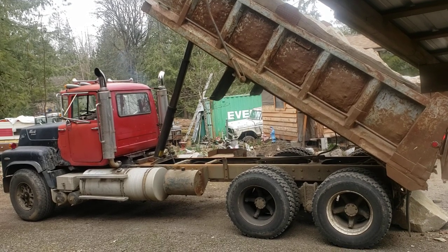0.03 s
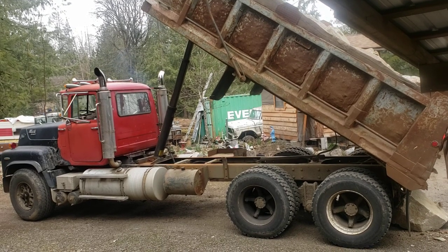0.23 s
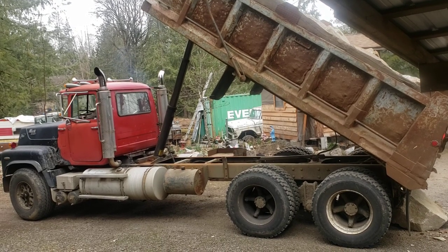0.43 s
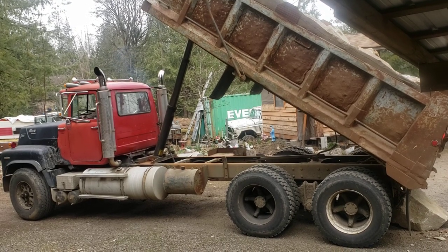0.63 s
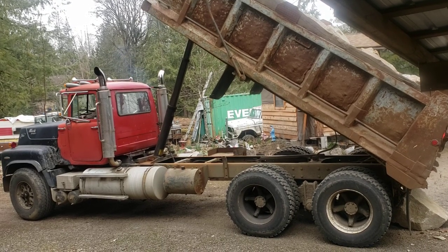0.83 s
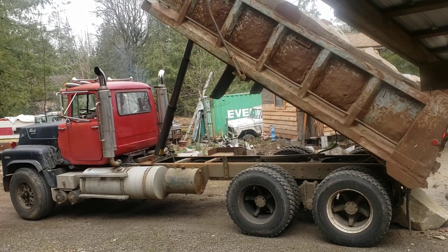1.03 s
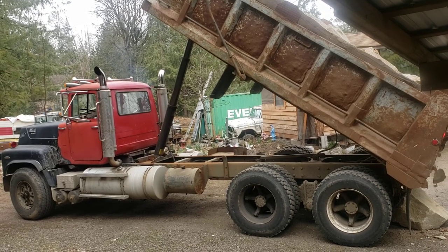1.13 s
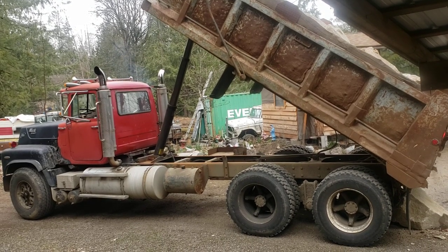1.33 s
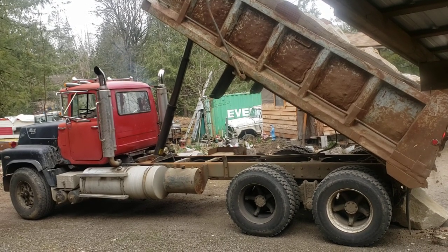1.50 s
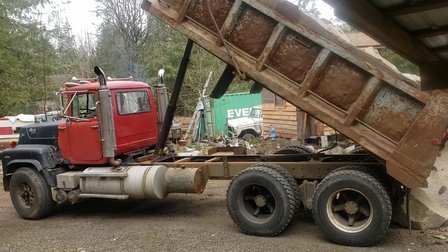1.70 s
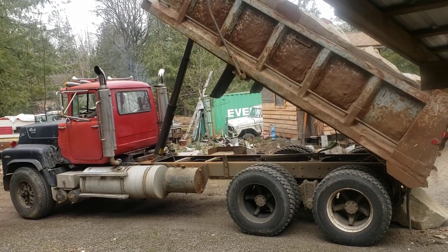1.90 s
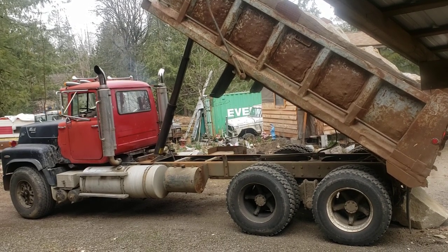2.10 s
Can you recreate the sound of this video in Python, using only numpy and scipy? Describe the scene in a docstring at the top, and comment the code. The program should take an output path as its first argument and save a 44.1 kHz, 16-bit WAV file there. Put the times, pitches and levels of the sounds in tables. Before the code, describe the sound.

A truck tailgate slams with a massive steel bang at about 0.35 s, several clashing blows packed together, weaker thumps until 0.85 s, and a ring dying within about half a second. Before it, a low diesel throbs and clatters under a falling hoist whine and faint whistle. The engine then eases quieter; a low hum swells near 0.9 s, and dry grit ticks and trickles until about 2.1 s.

```python
"""A dump truck stands in a gravel yard, its bed raised and its six-cylinder diesel running.
At first exhaust tones, drone and clatter sound under a sagging hoist whine, a whistle and trickling grit.
The tailgate then slams: decaying modes ring in bed and plates, and dying noise booms and clashes.
Panels pop as short low pulses and weaker bumps follow, while the engine eases off.
A bed hum swells and fades midway, soon after the slam; grit, as filtered noise, ticks to the end."""
import sys
import numpy as np
from scipy import signal
from scipy.fft import rfft, irfft
from scipy.io import wavfile
from scipy.ndimage import uniform_filter1d

SR = 44100
rng = np.random.default_rng(int(sys.argv[2]) if len(sys.argv) > 2 else 0)


def materialize(psi):
    """Save the field psi as 16-bit PCM at rate SR to the path in sys.argv[1].

    A 1-D psi becomes a single channel; in a 2-D psi each row is a channel.
    """
    bounded = np.clip(np.atleast_2d(psi).T, -1, 1)
    quanta = np.round(bounded * 32767).astype(np.int16)
    wavfile.write(sys.argv[1], SR, quanta)


N = 94815  # samples
T = np.arange(N) / SR
HZ = np.fft.rfftfreq(N, 1 / SR)


def amp(db):
    """Decibel law: 20 dB is a tenfold amplitude."""
    return 10 ** (np.asarray(db) / 20)


def evened(x):
    """Normalisation: scales to rms 1."""
    return x / np.sqrt(np.mean(x ** 2) + 1e-20)


def read(table, hz, axis=1):
    """Interpolation of one table column along a log-frequency axis."""
    rows = np.transpose(table)
    return np.interp(np.log(hz + 1), np.log(rows[0] + 1), rows[axis])


def curve(table, axis=1):
    """Linear interpolation of one table column over time."""
    rows = np.transpose(table)
    return np.interp(T, rows[0], rows[axis])


def add(mix, start_s, sound):
    """Superposition: adds a sound to the mix from its start, cut at the end."""
    part = mix[:, round(start_s * SR):][:, :sound.shape[-1]]
    part += sound[..., :part.shape[1]]


def colour(x, gain):
    """Linear filtering: multiplies the spectrum by a gain."""
    return irfft(rfft(x) * gain, N)


# Microphone pair: frequency_hz, left_right_correlation (-1 to 1), left_minus_right_db
MICROPHONE_PAIR = [(40, 0.72, 0), (150, 0.99, 0.5), (300, 0.92, -2.5), (644, 0.44, -1.6), (1370, -0.17, -1),
                   (2340, 0.084, 1.5), (4050, -0.13, -3.5), (7000, -0.26, -17), (9300, 0.16, -11.5),
                   (13000, -0.043, -1)]


def spread(x):
    """Partial coherence: mid and side weights set how alike left and right are in each band."""
    likeness = np.clip(read(MICROPHONE_PAIR, HZ), -1, 1)
    lean = amp(read(MICROPHONE_PAIR, HZ, axis=2))
    mid, side = rfft(x) * np.sqrt([1 + likeness, 1 - likeness])
    left_right = np.array([(mid + side) * lean, mid - side])
    return irfft(left_right / np.sqrt(1 + lean ** 2), N)


def noise(grain=0):
    """Modulated noise: random 32-sample steps of level make it gritty when grain is above zero."""
    lumps = np.repeat(rng.standard_normal(N // 32 + 1), 32)[:N]
    return spread(rng.standard_normal((2, N)) * np.exp(grain * lumps))


def ripple(depth_db):
    """Modal crowding: random peaks and dips across the spectrum, with an rms depth at the knots."""
    knot_spacing_hz = 44.94
    knots = rng.standard_normal(2000)
    return amp(depth_db * np.interp(HZ / knot_spacing_hz, np.arange(2000), knots))


def tone(hz, wander_hz):
    """Frequency modulation: a sine whose pitch wanders by an rms amount."""
    drift = evened(uniform_filter1d(rng.standard_normal(N), size=700))
    return np.sin(2 * np.pi * np.cumsum(hz + wander_hz * drift) / SR)


def fall(t60_s):
    """Exponential decay: 60 dB of fall in t60_s."""
    return np.exp(-np.log(1000) * T / t60_s)


def rise(rise_s):
    """Exponential build-up: the time constant is rise_s."""
    return 1 - np.exp(-T / rise_s)


def dying(x, table, rise_s):
    """Frequency-dependent damping: each band of coloured noise decays at its own rate."""
    hz, t, bands = signal.stft(colour(x, amp(read(table, HZ))), SR, nperseg=512)
    t60_s = read(table, hz, axis=2)[:, None]
    tail = signal.istft(bands * 1e-3 ** (t / t60_s), SR, nperseg=512)[1][:, :N]
    return evened(tail * rise(rise_s)) / np.sqrt(N)  # mean energy per channel 1


# Engine speed and exhaust: time_s, firing_rate_hz, exhaust_level_db (rms)
ENGINE = [(0, 39.1, -26.5), (.1, 39.8, -30), (.3, 39.7, -30), (.38, 39.7, -36), (.65, 40.07, -39.5),
          (.9, 39.37, -40.5), (1.1, 36.54, -43.5), (1.4, 38.6, -40), (1.75, 38.53, -37.5),
          (2.15, 38.5, -37)]


def firings():
    """Phase accumulation: the running count of cylinder firings."""
    return np.cumsum(curve(ENGINE)) / SR


# Exhaust tones: multiple_of_cycle_rate (6 is the firing rate), relative_level_db
EXHAUST_ORDERS = [(5, -23), (6, -1), (7, -21.5), (8, -9.5), (9, -40), (12, -10)]


def exhaust():
    """Harmonic series: the periodic exhaust is a sum of multiples of the cycle rate."""
    start_turns = 0.494
    cycles = firings() / 6  # six firings to a cycle
    orders = [amp(db) * -np.cos(2 * np.pi * round(order) * (cycles - start_turns))
              for order, db in EXHAUST_ORDERS]
    return evened(sum(orders)) * amp(curve(ENGINE, axis=2))


def engine_noise():
    """Amplitude modulation: noise that swells with each firing."""
    return noise() * (1 + 0.097 * np.cos(2 * np.pi * firings()))


# Drone spectrum: frequency_hz, relative_density_db (per Hz)
DRONE_SPECTRUM = [(20, -40), (60, 3.5), (85, -5), (110, 0.5), (145, 1), (185, 0), (230, -12.5), (400, -19),
                  (1000, -93)]
# Drone loudness: time_s, level_db (rms)
DRONE_LEVEL = [(0, -35), (.15, -35.5), (.31, -27.5), (.45, -33), (.7, -34.5), (.9, -41), (1.1, -44.5),
               (1.6, -45.5), (2.15, -41)]


def drone():
    """Spectral shaping: firing-pulsed noise filtered to a low drone."""
    return evened(colour(engine_noise(), amp(read(DRONE_SPECTRUM, HZ)))) * amp(curve(DRONE_LEVEL))


# Clatter spectrum before the ripple: frequency_hz, relative_density_db (per Hz)
CLATTER_SPECTRUM = [(30, -41), (110, 0), (150, 6.5), (185, 6), (235, -2), (290, 3), (400, -0.5), (540, -2),
                    (700, -2), (1000, 0), (1400, -6.5), (1700, -5), (2800, -15.5), (3600, -15), (7000, -21),
                    (8300, -30), (11500, -19), (15500, -29)]
# Resonances of engine and pump: centre_hz, half_amplitude_width_hz, relative_level_db
ENGINE_RESONANCES = [(789, 28, -49), (984, 42, -52.5), (1665, 36, -56), (2513, 47, -59)]
# Loudness of clatter and resonances together: time_s, relative_level_db
CLATTER_LEVEL = [(0, 5), (.3, 7), (.5, 2), (.75, -1.5), (1.1, -1.5), (1.5, 0), (2.15, -0.5)]


def clatter():
    """Resonance: rippled, pulsed clatter beside steady noise passed through narrow peaks."""
    clatter_db, ripple_db = -36.5, 1.22
    pulsed = engine_noise()
    gain = amp(read(CLATTER_SPECTRUM, HZ)) * ripple(ripple_db)
    rattling = amp(clatter_db) * evened(colour(pulsed, gain))
    drive = noise()
    whine = 0
    for hz, width_hz, db in ENGINE_RESONANCES:
        peak = 1 / (1 + (2 * (HZ - hz) / width_hz) ** 2)
        whine = whine + amp(db) * evened(colour(drive, peak))
    return (rattling + whine) * amp(curve(CLATTER_LEVEL))


def diesel():
    """Superposition: tonal exhaust plus the drone and clatter noises."""
    return exhaust() + drone() + clatter()


# Hoist whine, sagging and fading: time_s, pitch_hz (centre of the wander), level_db (peak)
HOIST = [(0, 1013, -42), (.06, 982, -37), (.15, 900, -41), (.22, 869, -61), (.34, 870, -62),
         (.5, 850, -110)]
# Higher, steady whistle: time_s, level_db (peak)
WHISTLE_LEVEL = [(0, -46), (.05, -41), (.13, -47), (.25, -63), (.4, -110)]


def hoist():
    """Frequency modulation: the loaded hoist gives two wandering sines, one of them gliding."""
    wander_hz, whistle_hz = 13.4, 1708
    whine = amp(curve(HOIST, axis=2)) * tone(curve(HOIST), wander_hz)
    return whine + amp(curve(WHISTLE_LEVEL)) * tone(whistle_hz, wander_hz)


# Trickling grit: time_s, level_db (rms)
GRIT_LEVEL = [(0, -51), (.25, -41), (.5, -51.5), (1.07, -51.5), (1.1, -42.5), (1.3, -45), (1.55, -42),
              (1.85, -43), (2.15, -42.5)]
# Spectrum of trickle and tick treble: frequency_hz, relative_density_db (per Hz)
GRIT_SPECTRUM = [(1000, -43), (3500, -22), (7000, -8.5), (8300, -20.5), (9500, -8.5), (10800, -1.5),
                 (12300, 2.5), (14000, -8.5), (15700, -8)]
# Lower treble of a tick: frequency_hz, relative_density_db (per Hz)
CLINK_SPECTRUM = [(1200, -1), (2300, 2.5), (3200, -3), (4500, 0), (6500, -1.5), (8500, -16), (15000, -40)]
# Ticks of grit and loose fittings: start_s, relative_level_db, lower_treble_over_high_db
TICKS = [(.028, -34.5, -15), (.112, -32, -3), (.163, -20, 6), (.199, -30, -12), (.212, -37, -16),
         (0.316, -28, -2), (0.88, -39, -10), (.943, -33.5, 1), (.957, -38, 14.5), (1.086, -32, -18),
         (1.149, -31, -21), (1.161, -29, -28), (1.234, -32.5, -3), (1.329, -39, -7), (1.376, -32, -26),
         (1.398, -25.5, -12), (1.466, -27, -6), (1.501, -27.5, -16), (1.74, -35, 0), (1.9632, -30, -4.5),
         (1.973, -27, -6), (2.034, -29, -23)]


def grit():
    """Impact noise: a fine trickle, with sharp ticks that each decay into a short scatter."""
    tick_db, tick_s = -5, 0.0044  # common gain, decay constant
    scatter_db, scatter_s = -7.5, 0.028
    fizz = amp(read(GRIT_SPECTRUM, HZ))
    out = amp(curve(GRIT_LEVEL)) * evened(colour(noise(grain=0.45), fizz))
    high = evened(colour(noise(), fizz))
    low = evened(colour(noise(), amp(read(CLINK_SPECTRUM, HZ))))
    for start_s, db, low_db in TICKS:
        age = np.maximum(T - start_s, 0)
        decay = np.exp(-age / tick_s) + amp(scatter_db) * np.exp(-age / scatter_s)
        blend = (high + amp(low_db) * low) / np.hypot(1, amp(low_db))
        out = out + amp(tick_db + db) * (T >= start_s) * decay * blend
    return out


# A panel pops in and out: centre_s, level_db (peak), pulse_hz (spectral peak)
POPS = [(0.17, -20, 110), (0.283, -20, 115), (0.3447, -8.5, 217), (.355, -9, 130), (0.482, -4, 144),
        (0.61, -20, 115), (0.765, -23, 103), (0.846, -27, 151)]


def pops():
    """Pulse radiation: a flexing panel gives one short, low push with a lobe on either side."""
    out = np.zeros(N)
    for centre_s, db, hz in POPS:
        u = (np.pi * hz * (T - centre_s)) ** 2
        out += amp(db) * (2 * u - 1) * np.exp(-u)
    return out


# Ringing of the bed: pitch_hz, relative_level_db, t60_s
BED_MODES = [(115, -6, .65), (141, -8, .7), (158, -9, .6), (180, -5, .5), (223.7, 1.5, .45), (243, -11, .5),
             (263, -8, .65), (336, -6, .52), (372, -16, .55), (446, -15, .55), (673, -18, .5),
             (695, -20, .5), (809, -21, .5), (935, -18, .33), (972, -19, .42)]


def bed_ring():
    """Modal superposition: decaying sines of alternating sign, swelling together."""
    ring_db, rise_s = -9.5, 0.01
    ring = 0
    for k, (hz, db, t60_s) in enumerate(BED_MODES):
        ring = ring + amp(db) * fall(t60_s) * np.sin(2 * np.pi * (hz * T + k / 2))
    return amp(ring_db) * rise(rise_s) * ring


# Ringing of the gate's plates: pitch_hz, relative_level_db
PLATE_MODES = [(1170, 1), (1318, -2), (1912, 0), (2012, -1), (2230, -1), (2505, 0), (3633, -4), (4328, -4),
               (6761, -6), (7456, -6), (10450, -4), (10780, -4), (11891, -2), (12450, -3), (13468, -1),
               (13610, -2)]


def plates():
    """Modal superposition: high steel modes reach each microphone in a different phase."""
    plate_db, t60_s, rise_s = -26.5, 0.35, 0.0088
    tones = np.zeros((2, N))
    for hz, db in PLATE_MODES:
        lean_db = read(MICROPHONE_PAIR, hz, axis=2) * np.array([[.5], [-.5]])
        turns = rng.random() + rng.random((2, 1)) / 2
        tones += amp(db) * amp(lean_db) * np.sin(2 * np.pi * (hz * T + turns))
    return amp(plate_db) * tones * fall(t60_s) * rise(rise_s)


# Dull flexing of the panels: frequency_hz, relative_density_db (per Hz), t60_s
BOOM = [(30, -31, 0.29), (70, -10, 0.3), (116, 1, 0.79), (177, 0.5, 0.18), (278, 1, 0.37), (443, -14, 0.59),
        (900, -33, 0.48), (3000, -47, 0.27)]
# Steel on steel, before ripple and brightness: frequency_hz, relative_density_db (per Hz), t60_s
CLASH = [(150, -22, 0.69), (450, -2, 0.4), (706, 7, 0.36), (950, 5, 0.31), (1450, 0.5, 0.3),
         (2330, 2, 0.27), (3150, -5.5, 0.36), (4440, -1.5, 0.3), (7000, -4, 0.35), (7700, -14, .38),
         (9650, -13, 0.33), (10300, -1.5, 0.33), (13800, -2, 0.26), (15500, -15.5, 0.31)]
# Tailgate blows: start_s, relative_boom_db, relative_clash_db, brightness_above_8_khz_db
BLOWS = [(.341, -3, 1, -10), (.358, -4.5, -1.5, 2.5), (.373, -4.5, -5.5, 4), (.399, -13, -7.5, 2.5),
         (.422, -10.5, -31, -6), (.512, -16.5, -22, -11), (.549, -18, -23, -3.5), (.596, -23, -26, -12)]


def tailgate():
    """Impact excitation: the slam rings bed and plates; each blow booms and clashes."""
    boom_gain_db, boom_rise_s = 21, 0.0013
    clash_gain_db, clash_rise_s = 16, 0.0018
    out, steel = np.zeros((2, N)), ripple(3.5)
    add(out, BLOWS[0][0], bed_ring() + plates())
    for start_s, boom_db, clash_db, bright_db in BLOWS:
        boom = amp(boom_gain_db) * dying(noise(), BOOM, boom_rise_s)
        clash = amp(clash_gain_db) * dying(noise(grain=0.34), CLASH, clash_rise_s)
        tilt = amp(bright_db * np.clip(HZ / 4000 - 1, 0, 1))  # from 4 kHz, full at 8 kHz
        clash = colour(clash, steel * tilt)
        add(out, start_s, amp(boom_db) * boom + amp(clash_db) * clash)
    return out


# Swelling of the bed's hum: time_s, level_db (peak)
HUM_LEVEL = [(.6, -83), (.8, -41), (.88, -31.5), (1.0, -38), (1.2, -48), (1.5, -82)]


def bed_hum():
    """Amplitude envelope: after the slam one low, slightly wandering tone swells and fades."""
    return amp(curve(HUM_LEVEL)) * tone(140.7, wander_hz=1)


def scene():
    """Superposition: all sources sound in one yard."""
    return tailgate() + pops() + diesel() + hoist() + bed_hum() + grit()


def record(dry):
    """Band limiting and saturation: a low cut, soft overload on loud peaks, then a treble limit."""
    low_cut_hz, ceiling, edge_hz = 32, 0.99, 15800
    thin = colour(dry, 1 / np.sqrt(1 + (low_cut_hz / (HZ + 1)) ** 16))
    held = ceiling * np.tanh(thin / ceiling)
    low_pass = signal.firwin(511, edge_hz, window=("kaiser", 9), fs=SR)
    return signal.oaconvolve(held, low_pass[None], "same")


dry = scene()
out = record(dry)
materialize(out)
```